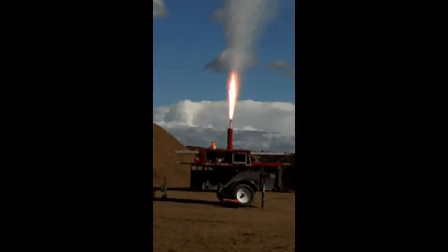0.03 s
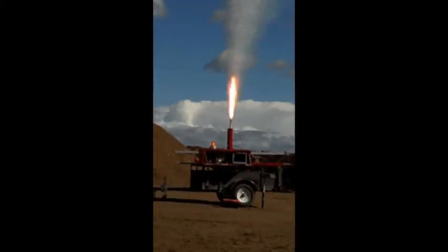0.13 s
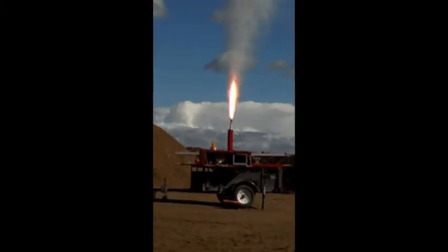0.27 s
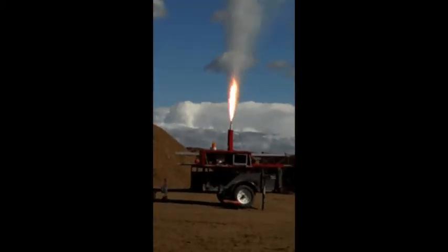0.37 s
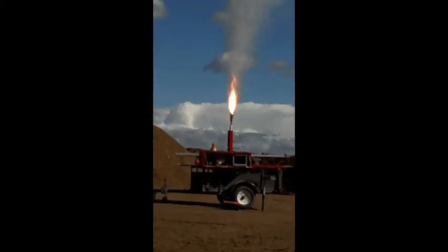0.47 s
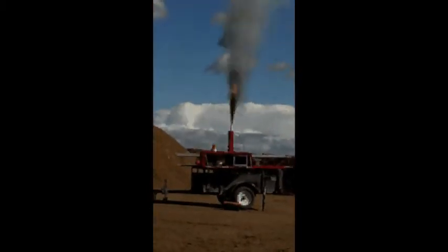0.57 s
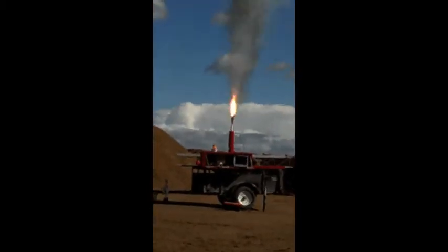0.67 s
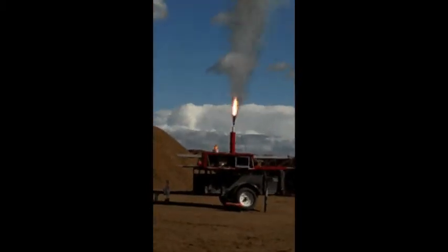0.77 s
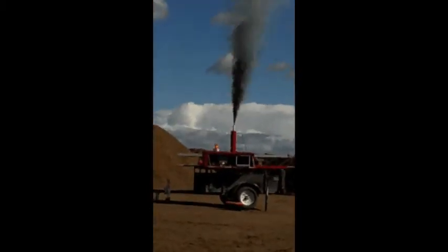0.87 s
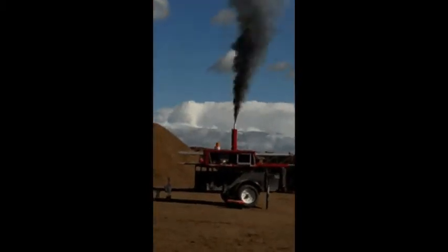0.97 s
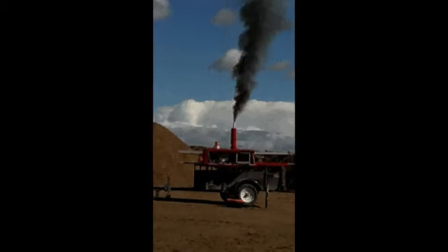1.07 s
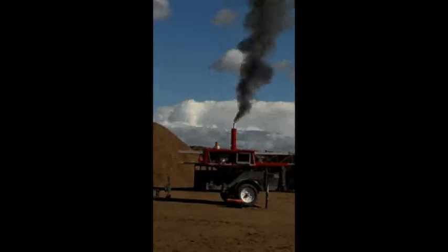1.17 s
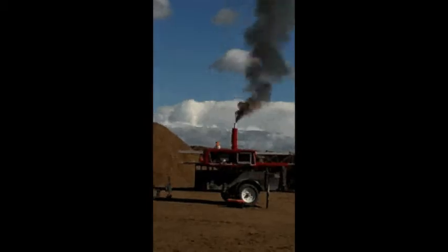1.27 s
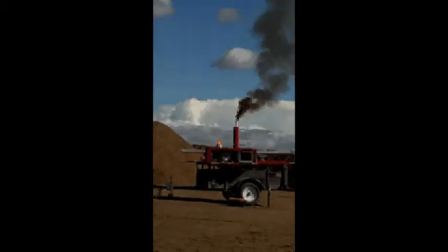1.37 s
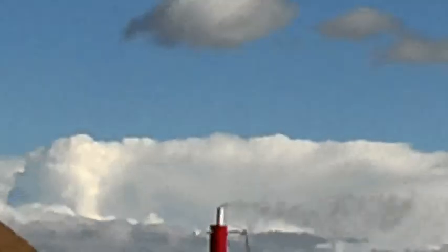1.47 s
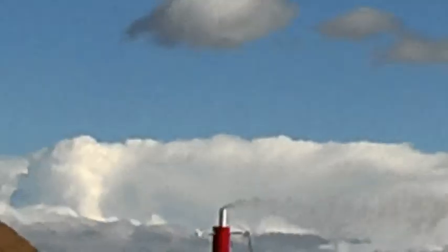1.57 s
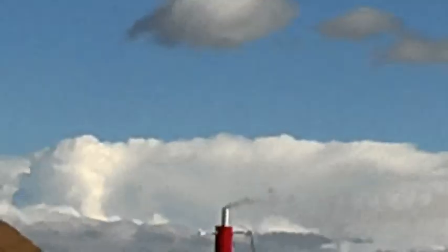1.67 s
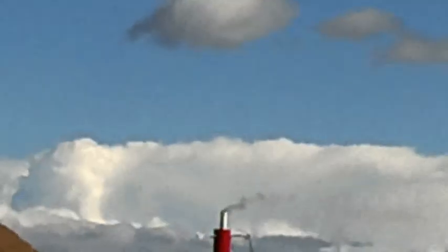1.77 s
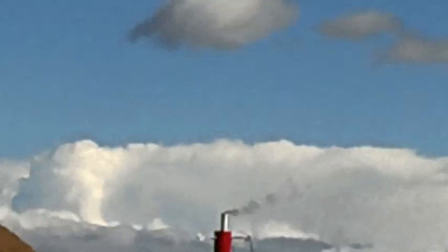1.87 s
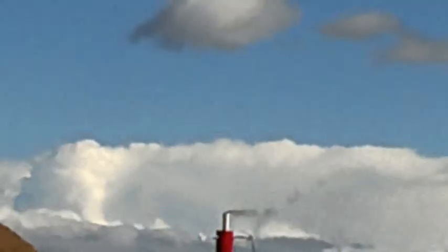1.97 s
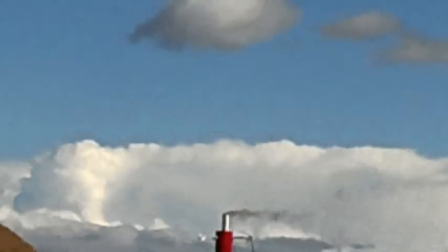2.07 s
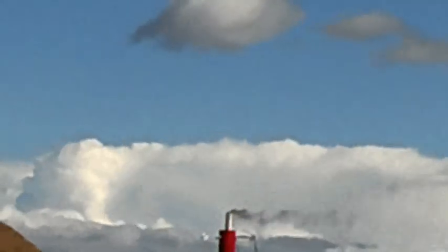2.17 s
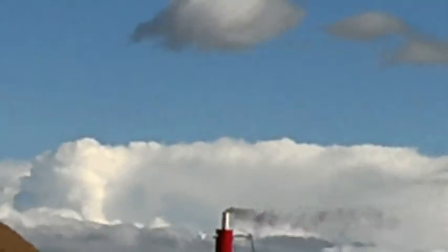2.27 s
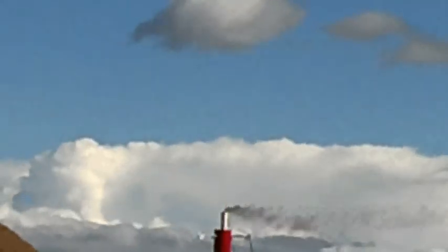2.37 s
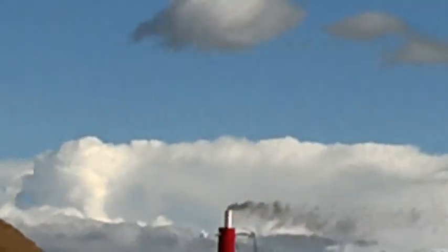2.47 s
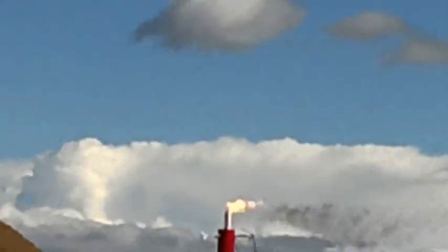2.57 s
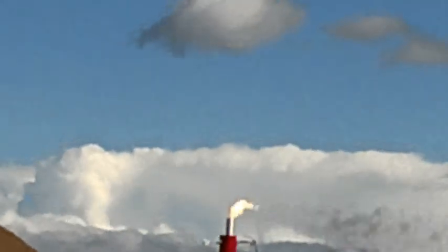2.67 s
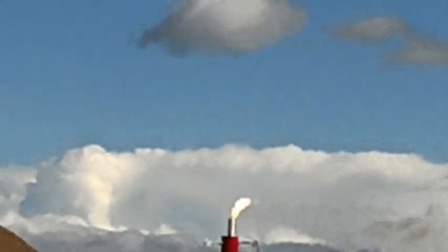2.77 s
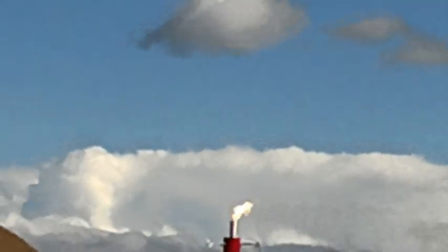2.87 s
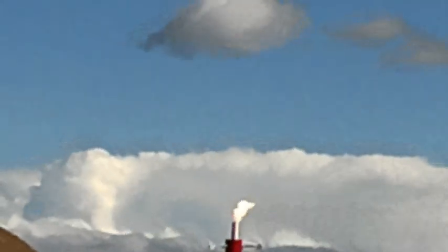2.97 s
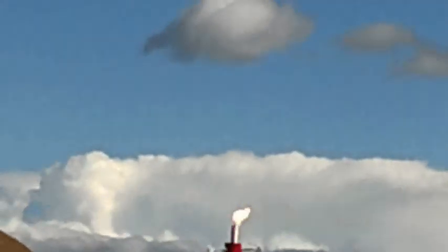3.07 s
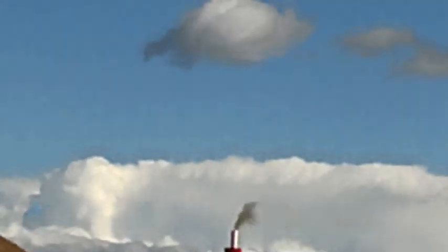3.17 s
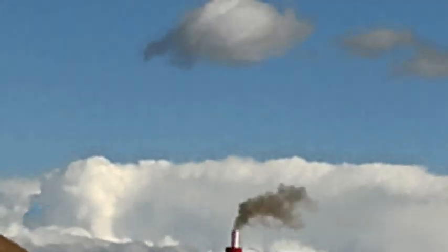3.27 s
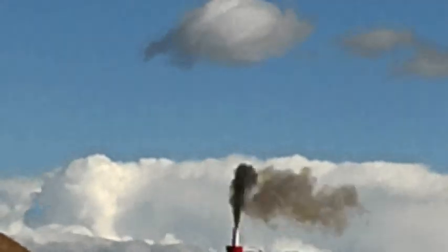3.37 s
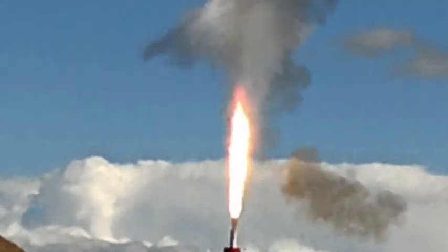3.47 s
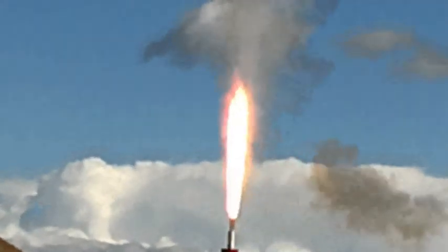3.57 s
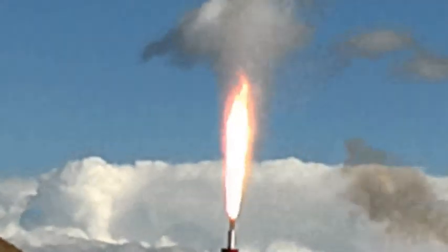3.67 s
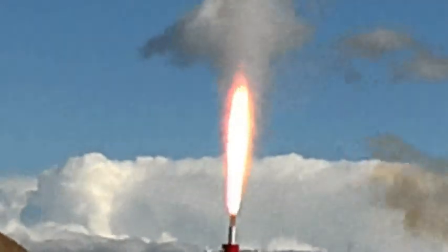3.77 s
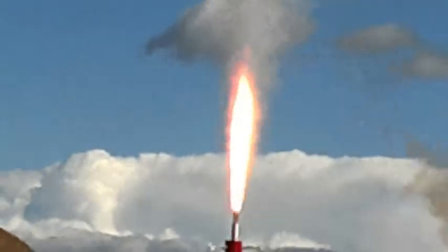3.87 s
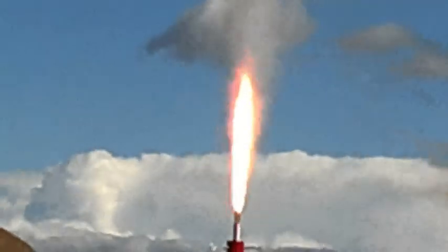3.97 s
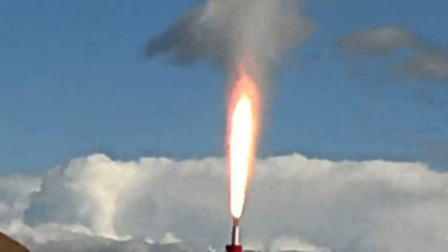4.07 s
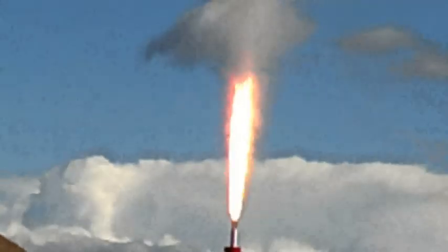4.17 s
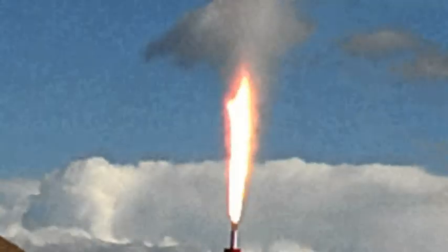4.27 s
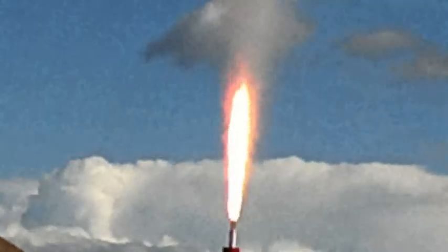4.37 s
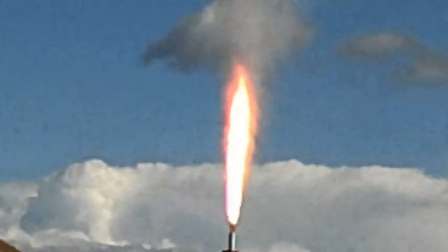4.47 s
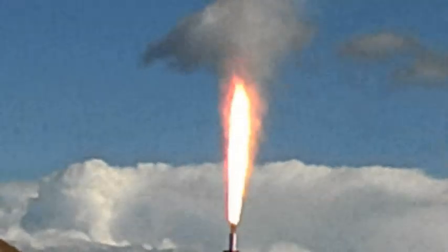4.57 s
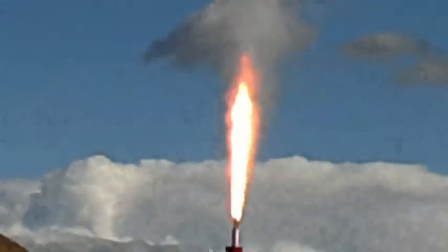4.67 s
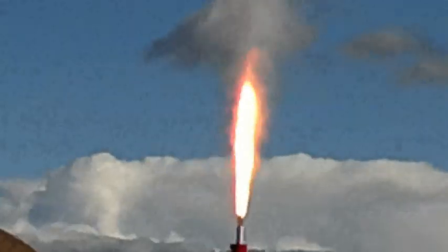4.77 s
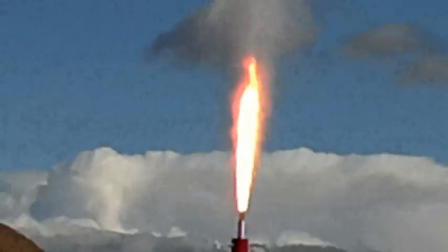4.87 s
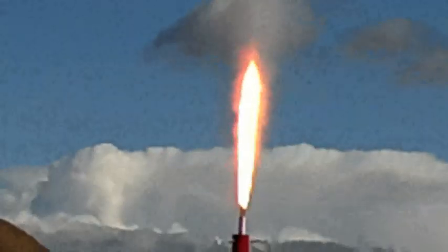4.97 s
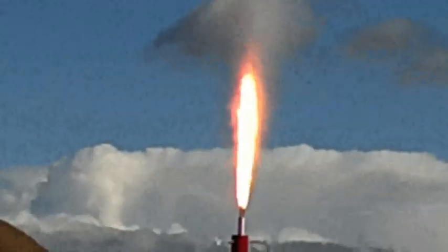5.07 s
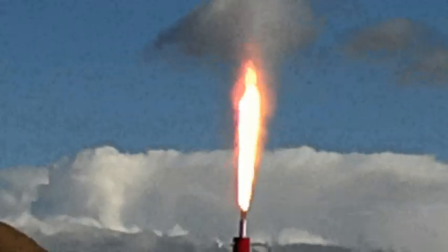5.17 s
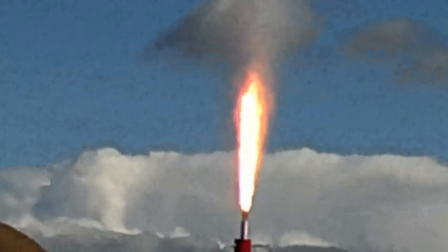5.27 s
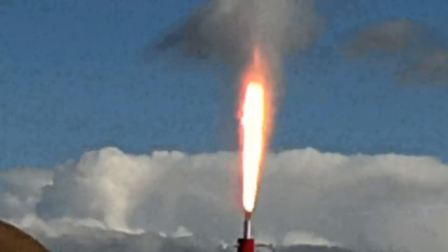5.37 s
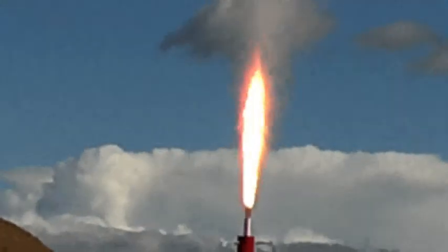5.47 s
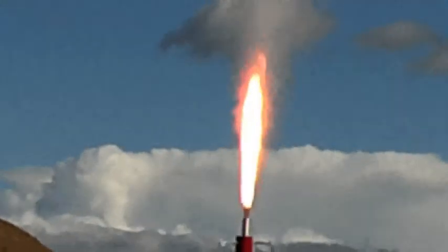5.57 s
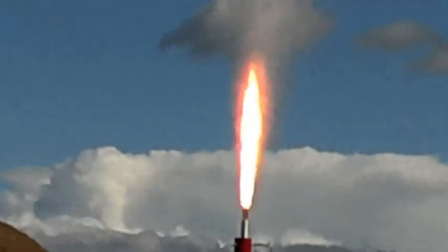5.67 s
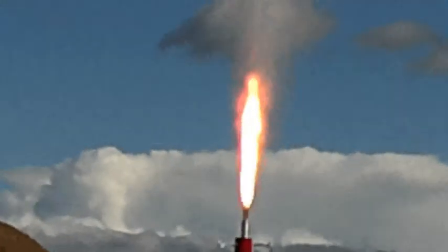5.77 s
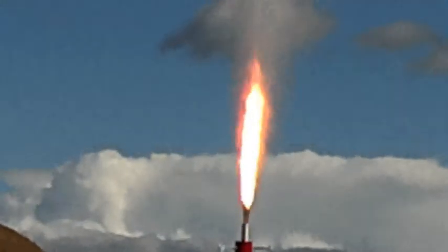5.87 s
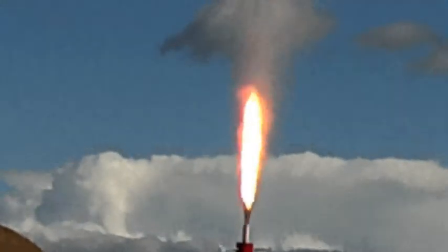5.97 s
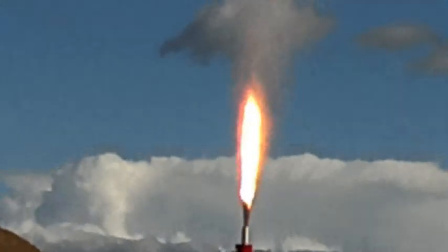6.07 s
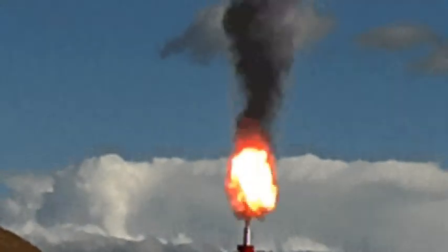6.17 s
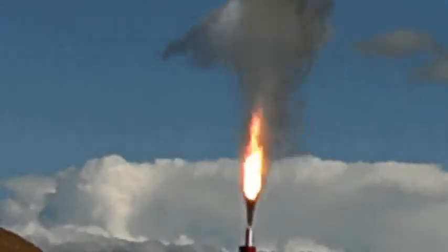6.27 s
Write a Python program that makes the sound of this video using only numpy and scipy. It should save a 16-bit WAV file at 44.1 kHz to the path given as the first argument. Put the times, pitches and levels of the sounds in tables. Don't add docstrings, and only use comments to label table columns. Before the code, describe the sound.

A rocket motor's harsh steady roar sputters out with pops and echoes, then wind buffets the microphone before it ignites again and roars on.

```python
import sys
import numpy as np
from scipy import signal
from scipy.fft import dct
from scipy.io import wavfile
from scipy.ndimage import uniform_filter1d

SR = 44100
rng = np.random.default_rng(int(sys.argv[2]) if len(sys.argv) > 2 else 0)


def magnitude_from_level(level_db):
    exponent = np.asarray(level_db, float) / 20
    return 10 ** exponent


def output_pcm(signal):
    pcm = np.clip(np.atleast_2d(signal).T, -1, 1) * 32767
    wavfile.write(sys.argv[1], SR, np.round(pcm).astype(np.int16))


N = 278705
HOP = 128
FRAME_RATE = SR / HOP
HZ = np.arange(257) * SR / 512
TIME = np.arange(-(-N // HOP) + 1) * HOP / SR
CUT_S, REPLAY_S = 1.4228, 5.61576
TICK_S = 1.1575
SURGE_FALL_DB_PER_S = 601.5

# frequency [Hz], level [dB].
JET_COLOUR = [(60, -64), (130, -4), (260, -0.5), (600, 0.5), (900, 2), (1500, -7.5), (2300, -7.5),
              (3150, -7.5), (4300, -3), (5250, -8.5), (7000, -13), (10300, -17), (11700, -30.5),
              (12500, -52.5)]


def spliced(x, rate):
    k = int(round(REPLAY_S * rate))
    return np.concatenate([x[..., :k], x[..., :x.shape[-1] - k]], axis=-1)


def walk(rate, count=1):
    k = max(int(SR / HOP / rate), 1)
    draws = rng.standard_normal((count, len(TIME) // k + 1))
    held = np.repeat(draws, k, axis=1)[:, :len(TIME)]
    slewed = uniform_filter1d(uniform_filter1d(held, k), k)
    return spliced(0.84 * slewed, FRAME_RATE)


def shape(points):
    hz, db = np.transpose(points)
    return np.interp(np.log(HZ + 1), np.log(hz), db)[:, None]


def band(lo_hz, hi_hz):
    def below(hz):
        return 1 / (1 + (HZ / hz) ** 8)
    return ((1 - below(lo_hz)) * below(hi_hz))[:, None]


def level_curve(points, fade_db_per_s=-400):
    s, db = np.transpose(points)
    outside_s = np.maximum(s[0] - TIME, 0) + np.maximum(TIME - s[-1], 0)
    return np.interp(TIME, s, db) + fade_db_per_s * outside_s


def humps(rows, rise, fall):
    s, length = np.transpose(rows)[:2, :, None]
    return -rise * np.maximum(s - TIME, 0) - fall * np.maximum(TIME - s - length, 0)


def turbulence(db):
    noise = spliced(rng.standard_normal(N), SR)
    z = signal.stft(noise, nperseg=512, noverlap=512 - HOP)[2]
    return signal.istft(z * magnitude_from_level(db[:, :z.shape[1]]), nperseg=512, noverlap=512 - HOP)[1][:N]


def housing():
    # frequency [Hz], width [Hz], lift [dB].
    resonances = [(1243.6, 169, 12.5), (1682, 230, 6), (3665, 200, 5), (4090, 94, 5.5), (6350, 230, 4.5),
                  (7510, 350, 5.5), (9330, 890, 8)]
    return sum(db / (1 + (2 * (HZ - hz) / width) ** 2) for hz, width, db in resonances)[:, None]


def eddies(slow_db, quick_db, shared_db):
    band_of = (np.linspace(0, 1, len(HZ)) ** .5 * 15).astype(int)
    swell = slow_db * walk(5, count=16)[band_of]
    flicker = quick_db * walk(30, count=16)[band_of]
    return swell + flicker + shared_db * band(1700, 3e4) * walk(24)


def seams(rate, depth_db, width_s):
    at = np.cumsum((1 + 0.27 * rng.standard_normal(200)) / rate)
    size = rng.uniform(.2, 1, 200)
    dips = (size * np.exp(-((TIME[:, None] - at) / width_s) ** 2)).sum(axis=1)
    return -depth_db * band(3800, 3e4) * dips


def surge(column):
    # start [s], length [s], howl shift [dB], rumble shift [dB].
    surges = [(0.38, 0.15, 10.5, 5), (0.558, 0.066, 9.5, 7), (0.687, 0.042, 7.5, -2),
              (0.743, 0.085, 10.5, 0.5), (0.833, 0.029, 8, 9.5), (0.898, 0.004, 5.5, 8.5),
              (0.93, 0.23, -10, -7.5), (1.185, 0.16, -3, -9), (3.2, 0.089, 7, 6.5),
              (3.328, 0.042, -12, -15.5), (4.148, 0.03, 6, 0.5)]
    size = np.transpose(surges)[column][:, None]
    left = np.maximum(np.abs(size) + humps(surges, 900, SURGE_FALL_DB_PER_S), 0)
    return (np.sign(size) * left).sum(axis=0)


def thrust():
    # time [s], level [dB].
    burnout = [
        (0.0, -24.5),
        (0.35, -25),
        (0.55, -27.5),
        (0.72, -25.5),
        (0.826, -27.5),
        (0.878, -37),
    ]
    # start [s], hiss level [dB].
    echoes = [
        (0.885, -35.5),
        (1.068, -42.5),
        (1.165, -52),
    ]
    # time [s], level [dB].
    light_up = [
        (3.2, -69),
        (3.3, -46),
        (3.345, -32),
        (3.38, -27.5),
        (3.392, -26),
        (4.1, -25.5),
        (4.39, -27),
        (4.55, -25.5),
        (5.62, -25),
    ]
    db = level_curve(burnout, 0)
    for s, echo_db in echoes:
        db = np.where(TIME > s, echo_db - 15 * (TIME - s), db)
    chuff = 7 + humps([(0.897, 0.005)], 2000, SURGE_FALL_DB_PER_S)[0]
    db = db + np.maximum(chuff, 0)
    return np.where(TIME < CUT_S + .02, db, level_curve(light_up))


def jet():
    hiss = spliced(thrust(), FRAME_RATE)
    howl = spliced(0.34 + surge(column=2), FRAME_RATE)
    shift = spliced(surge(column=3), FRAME_RATE)
    drift = walk(12, count=3)
    howl = howl + 1.4 * drift[0]
    roar = -4.5 + 0.3 * shift + 1.2 * drift[1]
    rumble = -6.5 + shift + 1.7 * drift[2]
    db = shape(JET_COLOUR) + housing() + hiss + 13 + eddies(0.16, 1.52, 0.81) + seams(18, 15, 0.0029)
    db = db + band(770, 1420) * (howl - 1.5) + band(1420, 3000) * (roar + 6) + band(1, 620) * (rumble + 4)
    t = np.arange(N) / SR
    return turbulence(db) * ((t < CUT_S) | (t > 3))


def knocks(rows, top_hz, rise_s):
    out, t = np.zeros(N + 4096), np.arange(4096) / SR
    for s, db, hz, t60, rough in rows:
        skin = rough * uniform_filter1d(rng.standard_normal(4096), 9) * 3
        swing = np.sin(2 * np.pi * hz * t) + skin
        envelope = np.exp(-np.log(1000) * t / t60) * np.minimum(t / rise_s, 1) ** 2
        out[int(s * SR):][:4096] += magnitude_from_level(db) * swing * envelope
    return signal.sosfilt(signal.butter(4, top_hz, fs=SR, output="sos"), out[:N])


def chamber_pops():
    # time [s], peak [dB], frequency [Hz], fall by 60 dB [s].
    pops = [
        (0.841, -15, 858, 0.037),
        (0.849, -21, 1284, 0.053),
        (0.8901, -10.5, 900, 0.018),
        (0.893, -16, 1221, 0.04),
        (3.387, -9.5, 806, 0.044),
        (3.392, -14, 1250, 0.032),
    ]
    return knocks([(s, db - 4.5, hz, t60, .5) for s, db, hz, t60 in pops], 3300, 0.00038)


def tick():
    return magnitude_from_level(-34.5) * (np.arange(N) == int(TICK_S * SR))


def wind():
    # start [s], length [s], buffet level [dB], edge over buffet [dB].
    gust_rows = [(1.184, 0.025, -54, -2), (1.296, 0.015, -56, -9), (1.38, 0.014, -54, -5),
                 (1.432, 0.01, -52, -20), (1.462, 0.02, -54.5, -25), (1.507, 0.035, -48, -13),
                 (1.576, 0.012, -52, -20), (1.66, 0.012, -43.5, -19), (1.69, 0.02, -54, -20),
                 (1.718, 0.035, -37, -10), (1.76, 0.045, -34.5, -3), (1.816, 0.022, -42, -15),
                 (1.87, 0.025, -62, -27), (1.925, 0.064, -52, -22), (2.01, 0.047, -44.5, -15),
                 (2.134, 0.017, -36.5, -9), (2.175, 0.031, -46.5, -27.5), (2.362, 0.08, -52.5, -15),
                 (2.465, 0.044, -49, -5), (2.535, 0.03, -48, -3), (2.572, 0.023, -33.5, -3),
                 (2.628, 0.19, -43, 11), (2.84, 0.04, -36, 4), (2.882, 0.035, -28.5, 4),
                 (2.945, 0.02, -29, 2), (3.005, 0.032, -30.5, 3), (3.053, 0.037, -44, 17),
                 (3.104, 0.031, -40, 20), (3.22, 0.015, -47, -4), (3.26, 0.03, -46, -8)]
    # frequency [Hz], level [dB].
    buffet_colour = [(30, -27), (60, -15), (110, 4), (200, -1.5), (400, -10.5), (700, -28), (1200, -53),
                     (2500, -61), (12000, -83)]
    level_db, edge_db = np.transpose(gust_rows)[2:, :, None]
    lull = magnitude_from_level(level_curve([(1.2, -61), (3.28, -61)]))
    gusts = magnitude_from_level(level_db + humps(gust_rows, 900, 550))
    total = lull + gusts.sum(axis=0) + 1e-30
    buffet = 20 * np.log10(total)
    edge = (lull * -22 + (gusts * edge_db).sum(axis=0)) / total
    db = shape(buffet_colour) + buffet + 15 + band(439, 3e4) * (edge + 11)
    return turbulence(db + 4.0 * walk(45))


def wind_slaps():
    # time [s], peak [dB], frequency [Hz].
    slaps = [(1.289, -40.5, 299), (1.382, -35.5, 355), (1.47, -40, 156), (1.534, -41, 186),
             (1.574, -47, 170), (1.662, -37.5, 206), (1.715, -27.5, 211), (1.728, -34, 199),
             (1.761, -44, 557), (1.762, -21.5, 412), (1.771, -27, 161), (1.789, -26, 135),
             (1.793, -23.5, 404), (1.926, -40, 132), (2.014, -37, 140), (2.136, -23, 172),
             (2.364, -48.5, 238), (2.468, -42.5, 189), (2.488, -41, 213), (2.538, -41, 145),
             (2.579, -23.5, 152), (2.603, -28, 283), (2.897, -25.5, 380), (2.914, -21, 132),
             (2.949, -18, 186), (2.969, -34, 172), (3.021, -23, 350), (3.078, -28, 298), (3.226, -32, 220),
             (3.266, -30, 217)]
    return knocks([(s, db + 8.0, hz, 0.026, .2) for s, db, hz in slaps], 800, 0.004)


def smoulder():
    # time [s], hiss level [dB].
    flame = [
        (1.43, -86.5),
        (2.0, -84.5),
        (2.25, -80.5),
        (2.46, -78.5),
        (2.58, -68),
        (2.72, -66.5),
        (2.87, -59.5),
        (3.05, -64),
        (3.3, -71.5),
    ]
    hiss = level_curve(flame, -100)
    mid = hiss + 8
    db = shape(JET_COLOUR) + 1.42 * housing() + 14
    db = db + band(1, 2460) * mid + band(2484, 3e4) * hiss + band(5700, 3e4) * -7
    return turbulence(db + eddies(.6, 1.6, 1.)) * (np.arange(N) / SR > CUT_S)


def slap_snaps():
    # time [s], peak [dB], frequency [Hz].
    snaps = [
        (1.718, -43, 600),
        (1.7645, -40, 1000),
        (2.488, -47, 700),
        (3.03, -32, 650),
    ]
    return knocks([(s, db, hz, 0.01, .8) for s, db, hz in snaps], 1800, 0.0006)


def scene():
    far = jet() + chamber_pops() + smoulder()
    near = tick() + wind() + wind_slaps() + slap_snaps()
    return (far + near)[None]


def flanks(hz):
    # flank starts [Hz], always empty from [Hz], to [Hz], flank ends [Hz].
    gap_edges = [(2350, 2800, 2965, 3100), (5260, 5440, 5620, 5820), (7780, 8090, 8350, 8830),
                 (10340, 10780, 11260, 11740)]
    # from [Hz], to [Hz], share of blocks.
    lone_slices = [(1970, 2070, .1), (2350, 2465, .4), (10380, 10500, .55), (11520, 11700, .55),
                   (12620, 23000, 1)]
    ramp = [0, .17, .65, 1]
    for start, lo, hi, end in gap_edges:
        middle = (lo + hi) / 2
        yield np.interp(hz, [start, start + 30, lo - 50, lo], ramp) * (hz < middle)
        yield np.interp(-hz, [-end, 30 - end, -hi - 35, -hi], ramp) * (hz >= middle)
    for lo, hi, share in lone_slices:
        yield share * ((hz > lo) & (hz < hi))


def bass_passed(s, bass_db):
    # start [s], length [s], level [dB].
    early = [
        (0.028, 0.108, -44.5),
        (0.212, 0.045, -40.5),
        (0.322, 0.04, -45.5),
        (0.387, 0.066, -46.5),
        (0.513, 0.125, -46.5),
        (0.722, 0.043, -47),
        (0.833, 0.077, -47),
    ]
    # start [s], length [s], level [dB].
    late = [(3.366, 0.049, -50), (3.43, 0.052, -47), (3.556, 0.031, -51), (3.813, 0.05, -45),
            (3.885, 0.03, -51), (4.011, 0.032, -47), (4.055, 0.036, -52), (4.228, 0.097, -48),
            (4.345, 0.045, -50), (4.466, 0.025, -52), (4.648, 0.04, -50.5), (5.043, 0.09, -49),
            (5.228, 0.048, -45.5), (5.315, 0.056, -42), (5.504, 0.038, -50)]
    rows = np.vstack([early, late])
    best = (rows[:, 2:] - bass_db + humps(rows, 2000, 2000)).max(axis=0)
    roaring = (TIME < .99) | (TIME > 3.3)
    return np.interp(s, TIME, spliced(np.maximum(best, -40), FRAME_RATE) * roaring)


def gaps(x, skirt_db, bass_db):
    attacks_s = [1.16, 2.58, 3.02, 3.39]
    size, grid = 1024, 285
    window = signal.windows.kaiser_bessel_derived(2 * size, 4 * np.pi)
    padded = np.pad(x[0], (2 * size - grid, 3 * size))
    lapped = np.lib.stride_tricks.sliding_window_view(padded, 2 * size)[::size] * window
    a, b, c, d = np.split(lapped, 4, axis=1)
    bins = dct(np.hstack([-c[:, ::-1] - d, a - b[:, ::-1]]), type=4, norm="ortho")
    hz = (np.arange(size) + .5) * SR / 2 / size
    s = (grid + (np.arange(len(bins)) - 1) * size) / SR
    keep = np.ones(bins.shape)
    for share in flanks(hz):
        held = np.repeat(rng.random(len(s)), rng.integers(1, 4, len(s)))[:len(s)]
        rank = np.argsort(np.argsort(held)) / len(s)
        keep *= (rank[:, None] >= share) * magnitude_from_level(skirt_db * share)
    attack = np.abs(s[:, None] - attacks_s).min(axis=1) < .012
    keep[attack] = np.maximum(keep[attack], .2 * (hz < 9000))
    keep[np.abs(s - TICK_S) < .012] = 1
    keep[np.ix_((s > TICK_S + .02) & (s < 3.3), hz > 10500)] = 0
    keep *= magnitude_from_level(np.outer(bass_passed(s, bass_db), 1 / (1 + (hz / 172) ** 14)))
    late, early = np.split(dct(bins * keep, type=4, norm="ortho"), 2, axis=1)
    blocks = np.hstack([early, -early[:, ::-1], -late[:, ::-1], -late]) * window
    joined = blocks[1:, :size] + blocks[:-1, size:]
    return joined.ravel()[None, size - grid:][:, :N]


def low_pass(x):
    return signal.sosfilt(signal.butter(12, 12530, fs=SR, output="sos"), x)


def record(dry):
    port = signal.sosfilt(signal.butter(4, 95, "high", fs=SR, output="sos"), dry)
    rounded = np.tanh(1.282 * port) / 1.309
    return low_pass(gaps(rounded, skirt_db=-10.5, bass_db=-46.5))


dry = scene()
out = record(dry)
output_pcm(out)
```